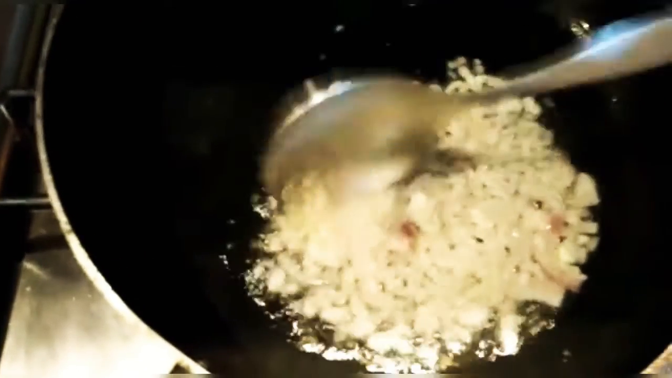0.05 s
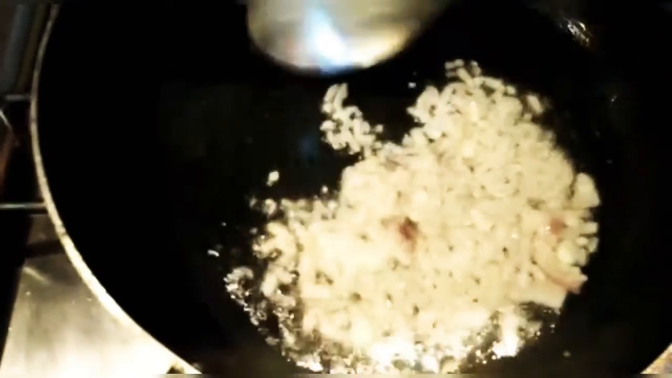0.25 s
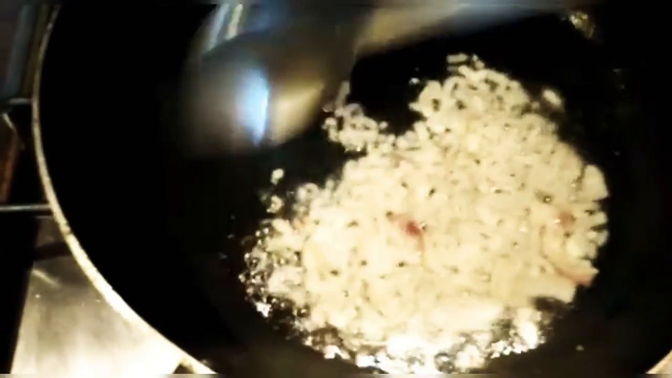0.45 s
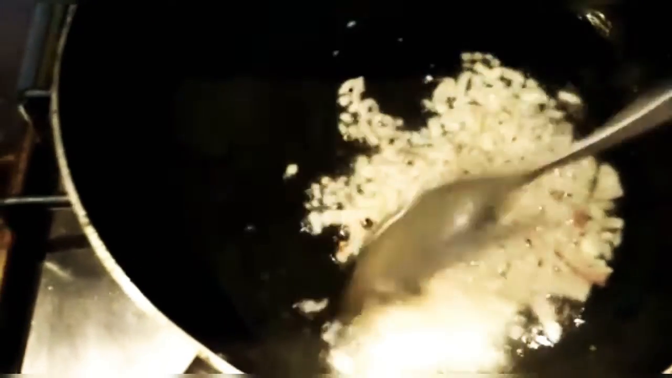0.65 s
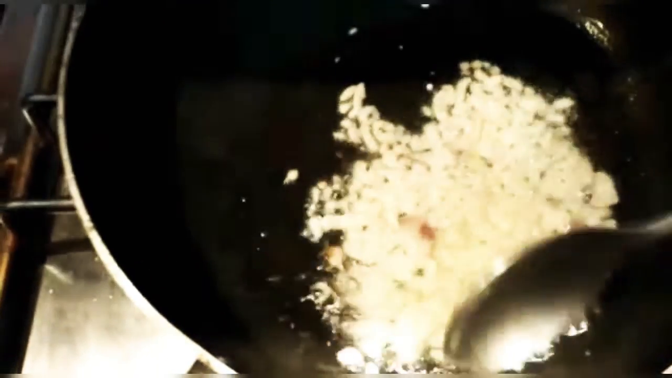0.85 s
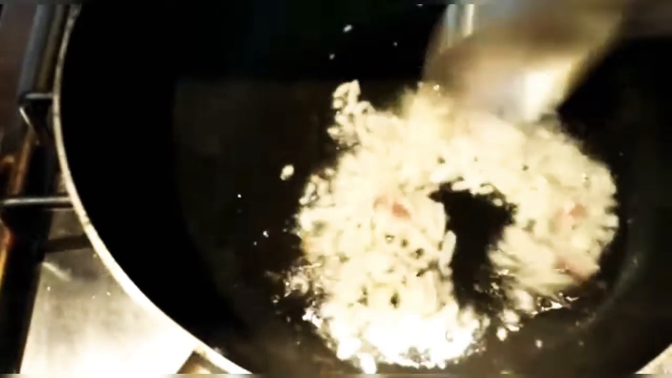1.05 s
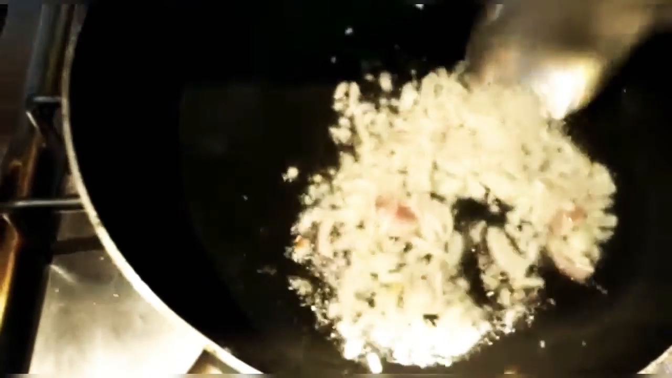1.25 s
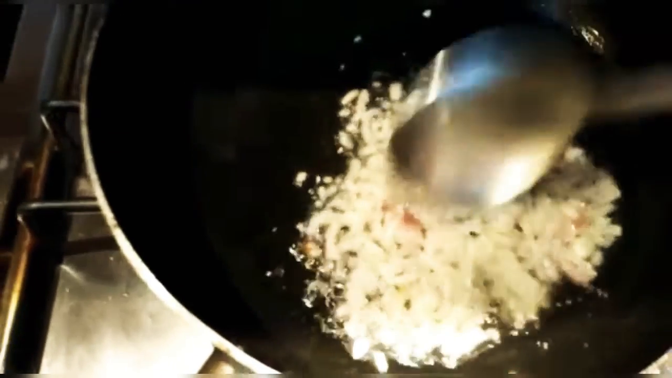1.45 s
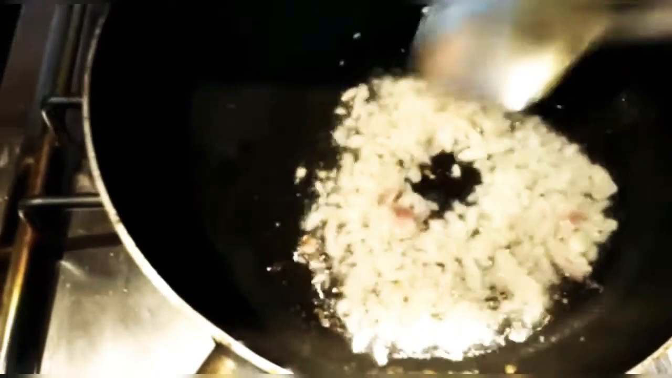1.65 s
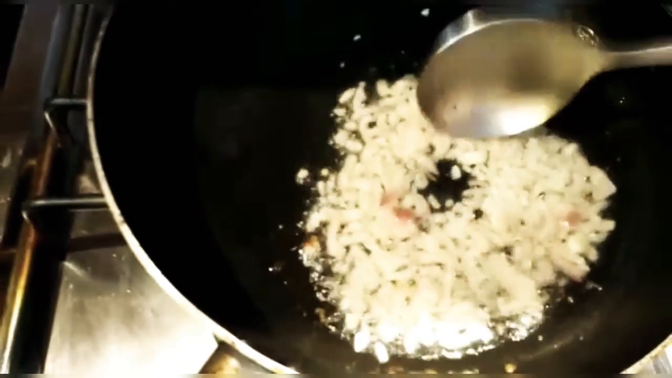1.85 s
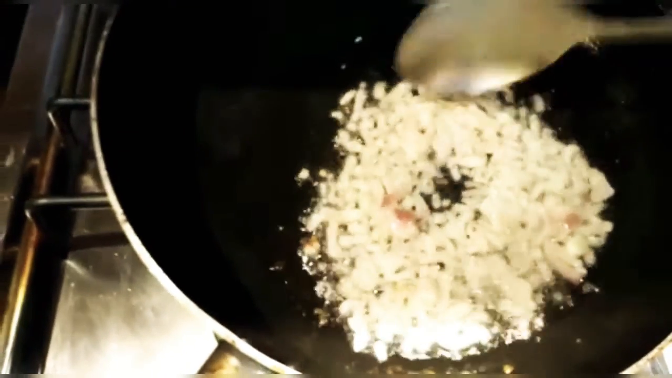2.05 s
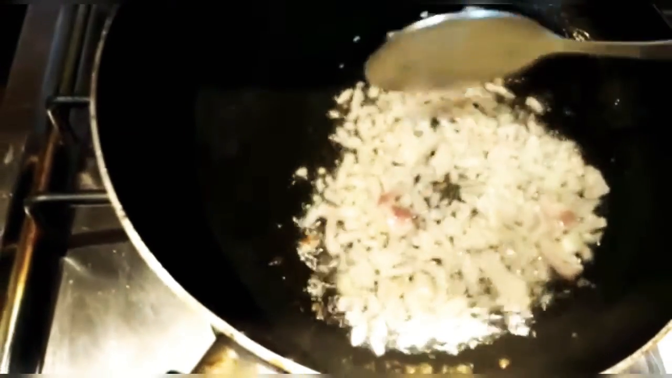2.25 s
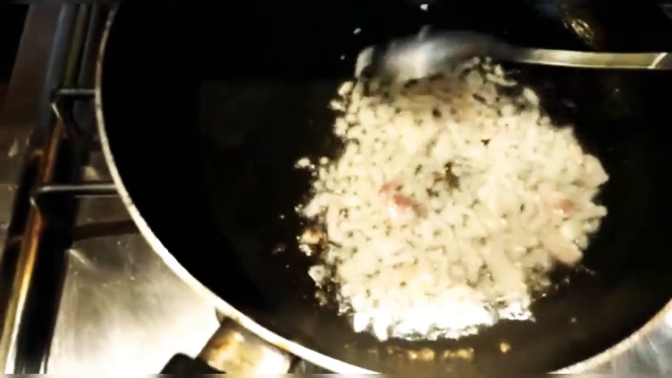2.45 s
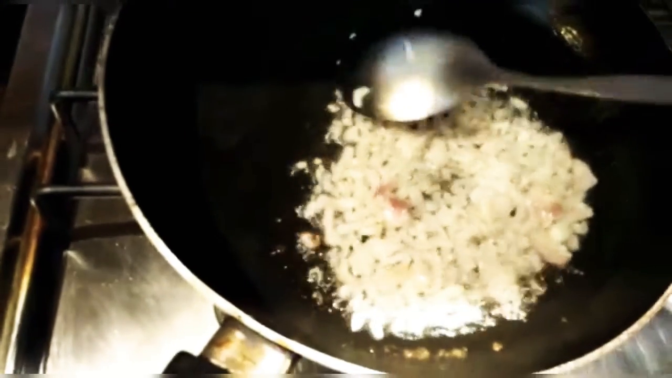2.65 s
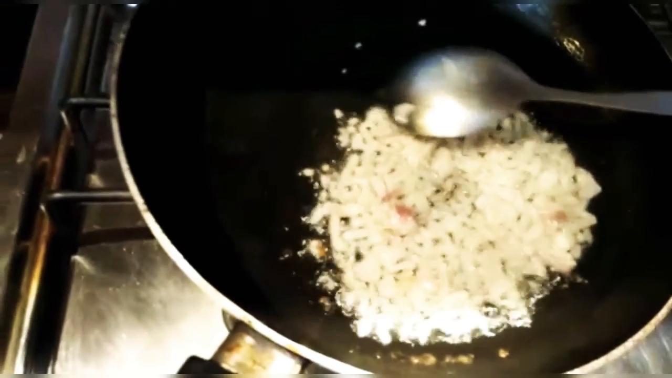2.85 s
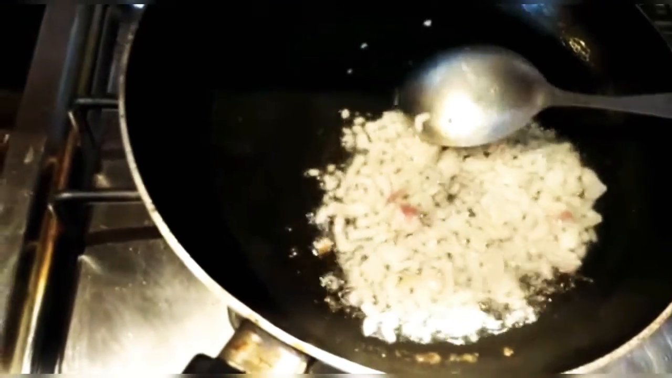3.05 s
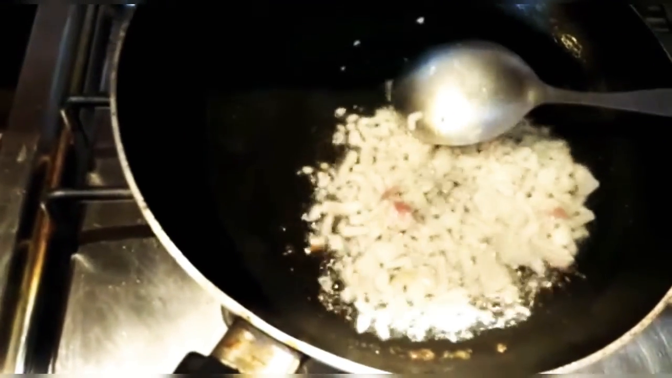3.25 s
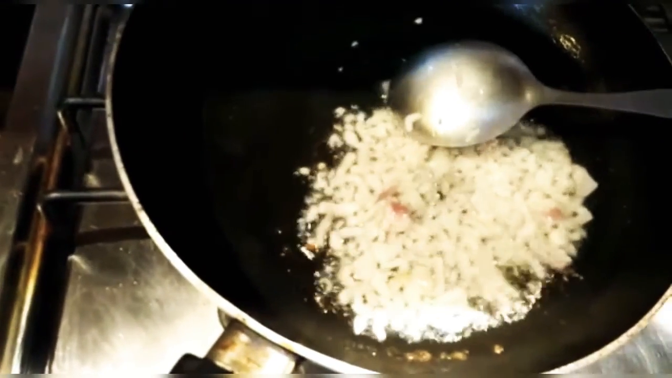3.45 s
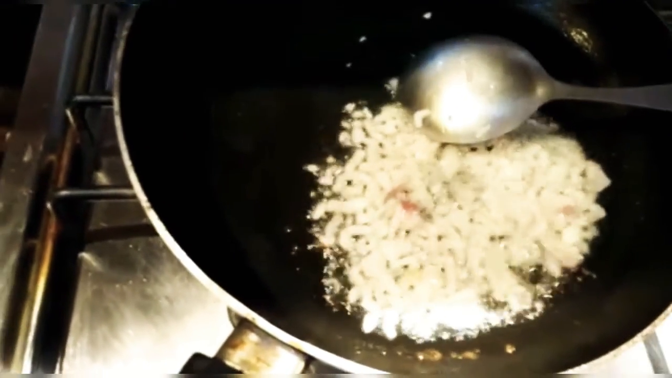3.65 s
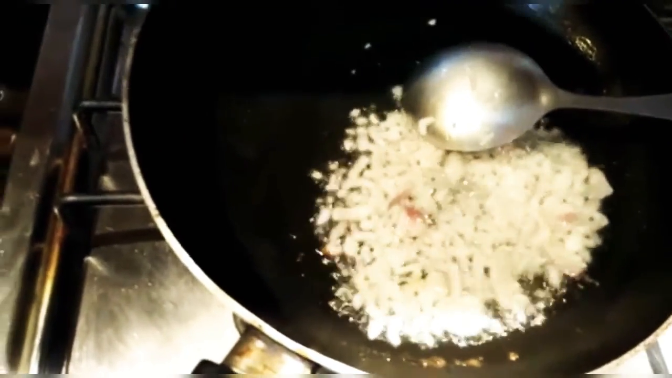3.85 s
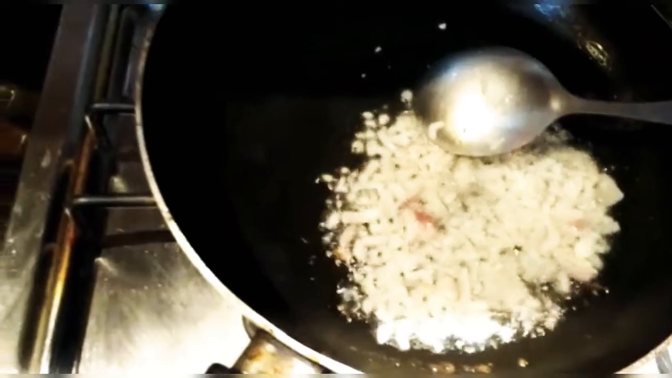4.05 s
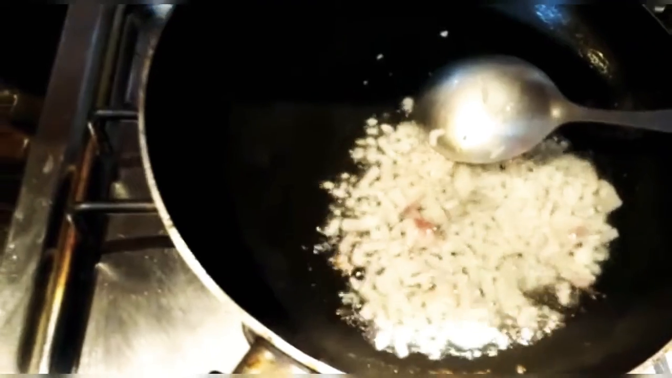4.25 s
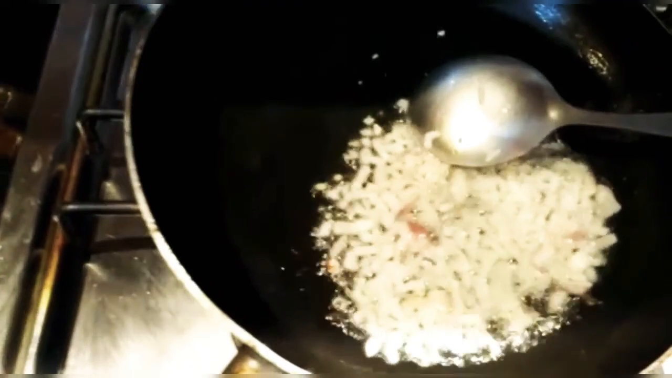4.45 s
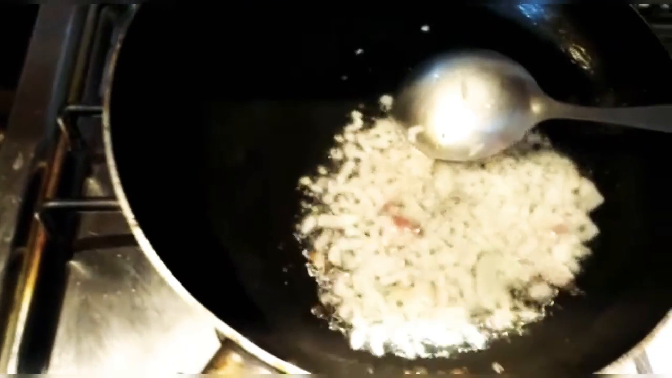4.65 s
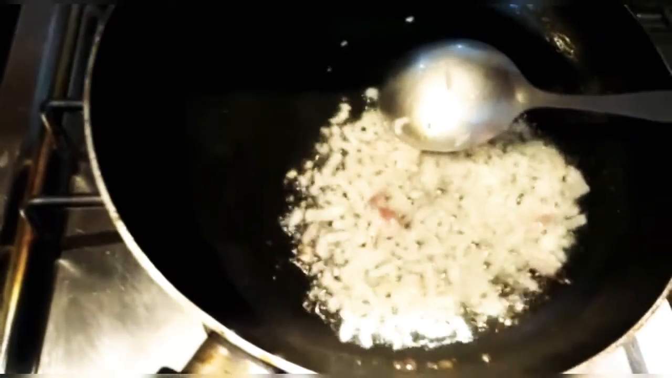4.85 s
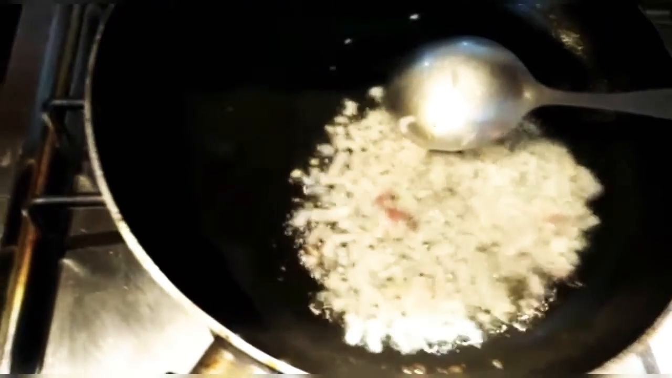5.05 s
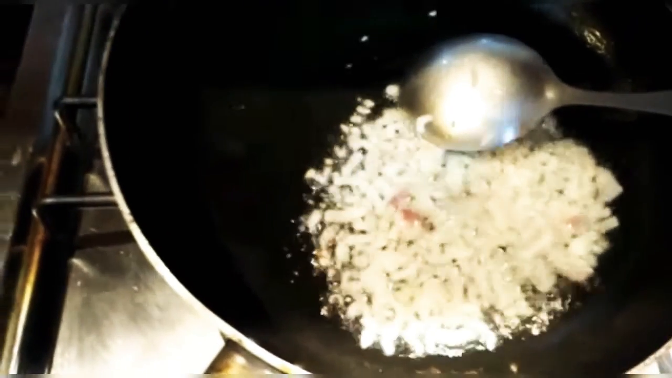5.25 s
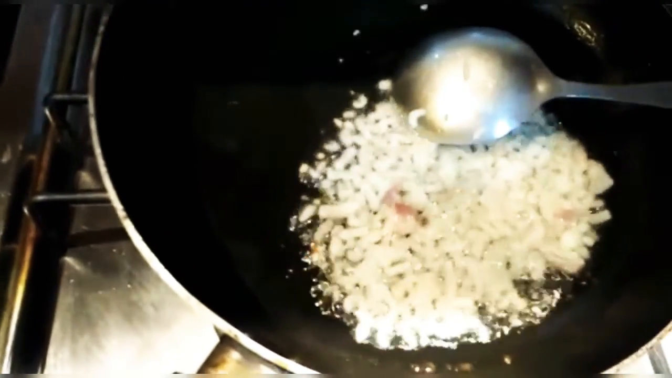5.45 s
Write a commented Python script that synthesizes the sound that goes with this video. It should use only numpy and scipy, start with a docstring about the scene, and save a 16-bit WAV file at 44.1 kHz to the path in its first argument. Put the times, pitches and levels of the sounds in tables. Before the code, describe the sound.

A close view of onions frying in a coated pan in a small, hard-walled kitchen. A fine, bright sizzle runs throughout, strongest at the very start, flaring slightly after pops and knocks. A steel spoon hits the pan in a tight double clack at about 0.16-0.22 s, again near 0.55 s with a faint scrape, then at 0.97 s followed by a soft gritty drag of about 0.2 s. More clacks come at 1.5 and 1.87 s, each with a brief scrape. A single hard knock rings at 3.12 s, and a very faint slide and touch follow around 3.4-3.6 s. After that there is only quiet frying: small crisp oil pops, fine crackle and a few dull bubble puffs, one lower at 5.27 s, thinning to the end at about 5.6 s. Knocks are midrange, metallic and quickly damped, with short room echoes above a faint low burner hum and rumble.

```python
"""Small hard kitchen: a steel spoon knocks and scrapes a coated pan while chopped onions fry gently in oil.
Blows ring damped sine modes of the pan; slip clicks of the dragged edge drive the same modes through resonators.
Droplets pop as short rings and noise bursts, bubbles puff, dense clicks in flickering bands make the sizzle.
Decaying noise echoes follow the close sounds above a low hum. Centred; only the treble of the sizzle is wide."""
import sys
import numpy as np
from scipy import signal
from scipy.io import wavfile

SR = 44100
rng = np.random.default_rng(int(sys.argv[2]) if len(sys.argv) > 2 else 0)


def file_out(sig):
    """Save sig as 16-bit WAV at sys.argv[1]."""
    # one column per channel
    cols = np.atleast_2d(sig).T
    # limit, then scale
    lim = np.clip(cols, -1, 1)
    pcm = np.round(lim * 32767).astype(np.int16)
    wavfile.write(sys.argv[1], SR, pcm)


N = 243443


def from_db(db):
    """Amplitude factor of a level in dB."""
    return 10 ** (np.asarray(db) / 20)


def rms_one(x):
    """Scale to rms 1."""
    return x / np.sqrt(np.mean(x ** 2) + 1e-20)


def drift(rate_hz):
    """Slow chance with spread 1: noise through two equal poles, at SR / 40."""
    r = np.exp(-80 * np.pi * rate_hz / SR)
    noise = rng.standard_normal(N // 40 + 2002)
    slow = rms_one(signal.lfilter([1], [1, -2 * r, r * r], noise)[2000:])
    return np.interp(np.arange(N) / 40, np.arange(len(slow)), slow)


def ring(clicks, hz, t60_s):
    """Damped resonator: a unit click sets a sine ringing from height 1."""
    r = from_db(-60 / (t60_s * SR))
    w = 2 * np.pi * hz / SR
    return signal.lfilter([0, np.sin(w)], [1, -2 * r * np.cos(w), r * r], clicks + 1e-18)


def band(x, low_hz, high_hz):
    """Band-pass, upper edge at most 0.45 SR."""
    sos = signal.butter(2, [low_hz, min(high_hz, .45 * SR)], "band", fs=SR, output="sos")
    return signal.sosfilt(sos, x)


def split_filter(order, hz, side):
    """Low-pass or high-pass sections."""
    return signal.butter(order, hz, side, fs=SR, output="sos")


def grains(per_s, spread_db):
    """Random clicks of uneven size and either sign; rms 1."""
    sizes = from_db(spread_db * np.minimum(rng.exponential(1, N), 5))
    signed = sizes * rng.choice([-1, 1], N)
    return rms_one(signed * (rng.random(N) < per_s / SR))


def coloured(sources, spectrum, patchy_db):
    """Half-octave bands, each with own level and flicker, fed by two unrelated sources in turn; rms 1."""
    out = 0
    together = drift(0.8)
    edges_hz = 110 * 2 ** np.arange(0, 7.6, .5)
    hz, level_db = np.transpose(spectrum)
    for k, (low_hz, high_hz) in enumerate(zip(edges_hz, edges_hz[1:])):
        band_db = np.interp(np.log(low_hz * high_hz) / 2, np.log(hz), level_db, -90, -90)
        flicker_db = patchy_db * (1.07 * together + drift(30))
        out = out + from_db(band_db + flicker_db) * band(sources[k % 2], low_hz, high_hz)
    return rms_one(out)


def add(out, s, sound):
    """Mix a sound in at s seconds."""
    at = round(s * SR)
    out[at:at + len(sound)] += sound[:N - at]


def burst(length_s, t60_s):
    """Noise that starts at once and dies away."""
    t = np.arange(round(length_s * SR)) / SR
    return rng.standard_normal(len(t)) * from_db(-60 * t / t60_s)


def after(times_s, level_db, rise_s, t60_s):
    """Envelope that swells after each moment and dies away: two one-pole smoothers in a row."""
    marks = np.zeros(N)
    marks[np.round(np.asarray(times_s) * SR).astype(int)] = from_db(level_db)
    rise = np.exp(-1 / (rise_s * SR))
    fall = from_db(-60 / (t60_s * SR))
    return signal.lfilter([1 - rise], np.convolve([1, -rise], [1, -fall]), marks + 1e-18)


# hum spectrum: f/Hz, relative level/dB per Hz
HUM = [(94, -43.5), (160, -9), (243, -10), (471, -9), (638, -6.5), (888, 6.5), (1170, -4.5), (1330, -7),
       (1580, -1), (2540, -7.5), (5000, -10.5), (6500, -27.5), (11000, -120)]
HUM_DB = -63
RUMBLE_DB, RUMBLE_WAVER_DB = -71.5, 4
SHAKE_DB, SHAKE_RISE_S, SHAKE_T60_S = -44.5, .006, 0.3   # stove top shakes most after knocks heavy in the bass


def hum():
    """Noise of burner and room above a wavering stove rumble that knocks stir up."""
    s, knock_db, *_, weight_db = np.transpose(KNOCKS)
    wavering = from_db(RUMBLE_DB + RUMBLE_WAVER_DB * drift(5))
    shake = after(s, knock_db + weight_db + SHAKE_DB, SHAKE_RISE_S, SHAKE_T60_S)
    rumble = (wavering + shake) * rms_one(band(rng.standard_normal(N), 40, 130))
    return rumble + from_db(HUM_DB) * coloured(rng.standard_normal((2, N)), HUM, patchy_db=1.4)


# sizzle spectrum: f/Hz, relative level/dB per Hz
SIZZLE = [(880, -46), (1500, -13.5), (2630, -7), (3260, -16), (4480, -6.5), (7010, -11), (9280, 7.5),
          (12600, -8.5), (13400, -13), (14000, -58)]


def sizzle():
    """Thousands of tiny steam bubbles a second, as clicks coming in gusts."""
    fizz = [grains(per_s=9000, spread_db=0.5) for _ in range(2)]
    return coloured(fizz, SIZZLE, patchy_db=2.0)


CRACKLE_PER_S, CRACKLE_DB = 51, -16   # level against the sizzle


def crackle():
    """Sparse tiny snaps riding on the sizzle."""
    return from_db(CRACKLE_DB) * rms_one(band(grains(CRACKLE_PER_S, spread_db=4.5), 5000, 17000))


# vigour of the frying before flares and gusts: t/s, level/dB
FRYING = [(0.0, -44), (0.21, -49), (0.69, -55), (1.03, -52), (1.38, -53), (2.09, -48), (2.2, -50),
          (2.49, -53), (2.67, -55), (2.91, -52), (3.03, -51), (3.14, -50.5), (3.95, -58.5), (4.4, -53.5),
          (4.81, -54), (5.2, -52.5), (5.4, -57), (5.52, -59)]
FLARE_DB, FLARE_RISE_S, FLARE_T60_S = -33.5, 0.011, 0.49
STIR_FLARE_DB = -44.5   # a knock presses wet onion into the oil
USUAL_SPATTER_S = .05


def frying():
    """Level of the sizzle: pops and knocks throw droplets that flare up and boil off."""
    pop_s, pop_db, _, spatter_s = np.transpose(POPS)
    hit_s, hit_db = np.transpose(KNOCKS)[:2]
    # a long spatter throws more
    thrown_db = pop_db + 20 * np.log10(np.maximum(spatter_s, .005) / USUAL_SPATTER_S)
    flare_db = np.append(thrown_db + FLARE_DB, hit_db + STIR_FLARE_DB)
    flare = after(np.append(pop_s, hit_s), flare_db, FLARE_RISE_S, FLARE_T60_S)
    gusts = from_db(1.0 * drift(9))
    vigour_db = np.interp(np.arange(N) / SR, *np.transpose(FRYING))
    return (from_db(vigour_db) + flare) * gusts


# droplets bursting in the oil: t/s, relative level/dB, f/Hz, spatter t60/s
POPS = [(0.0672, -20.5, 8600, 0.055), (0.294, -27.5, 7750, 0.081), (0.4193, -28, 8400, 0.028),
        (0.4565, -25, 9300, 0.028), (0.636, -23, 8900, 0.091), (0.826, -21, 9500, 0.039),
        (0.845, -20.5, 9500, 0.065), (0.9073, -24, 8950, 0.04), (1.0158, -25, 9600, 0.035),
        (1.311, -13.5, 6500, 0.018), (1.9385, -18.5, 9000, 0.069), (1.945, -23, 9000, 0.034),
        (1.9735, -23, 8040, 0.027), (2.096, -23.5, 8600, 0.031), (2.1126, -21, 9600, 0.05),
        (2.368, -14, 8950, 0.022), (2.3843, -30.5, 9500, 0.055), (2.4842, -27.5, 8840, 0.039),
        (2.4953, -14.5, 8700, 0.034), (2.873, -25, 9100, 0.033), (2.986, -25, 8500, 0.053),
        (3.0647, -26.5, 9330, 0.034), (3.252, -12.5, 10600, 0.027), (3.5649, -18.5, 6200, 0.016),
        (3.6132, -28.5, 7990, 0.1), (3.6423, -20, 9700, 0.025), (3.668, -25.5, 8300, 0.051),
        (3.7412, -30.5, 7670, 0.073), (3.7533, -27, 8300, 0.023), (4.085, -22, 10800, 0.076),
        (4.2385, -25, 9840, 0.061), (4.2686, -20.5, 7100, 0.022), (4.5042, -22, 10060, 0.026),
        (4.851, -37.5, 4450, 0.073), (5.0143, -31, 8100, 0.079), (5.1424, -25, 7600, 0.075),
        (5.1535, -35, 9910, 0.05), (5.2181, -22, 9800, 0.067)]
POP_DELAY_S = 0.0014
SNAP_DB, HISS_DB, THUD_DB, SPATTER_DB = 4, -5, -15, -9   # against the pop level


def pops():
    """A burst rings a few cycles, thuds on the pan and throws a short spatter."""
    out = np.zeros(N)
    click = np.eye(1, round(.15 * SR))[0]
    for s, level_db, hz, spatter_s in POPS:
        snap = from_db(SNAP_DB) * ring(click, hz, 10.0 / hz)
        hiss = from_db(HISS_DB) * band(burst(.15, t60_s=0.0022), 4950, 20000)
        thud = from_db(THUD_DB) * band(burst(.15, t60_s=0.018), 250, 3300)
        spatter = from_db(SPATTER_DB) * band(burst(.15, max(spatter_s, .005)), 6700, 12000)
        pop = band(snap + hiss, 0.6 * hz, 14000) + thud + spatter
        add(out, s + POP_DELAY_S, from_db(level_db) * pop)
    return out


# pan modes, also driven by the scrape: f/Hz, relative level/dB, t60/s before the cap by MOST_CYCLES
PAN = [(165, -26, 0.042), (276.2, -20, 0.18), (286, -38, 0.19), (477, -17, 0.079), (613, -17.5, 0.13),
       (709.7, -10, 0.14), (757, -2, 0.26), (798.3, -3, 0.42), (817, -8.5, 0.08), (915.5, -4, 0.057),
       (1023, 3, 0.038), (1100, -6.5, 0.27), (1211, -12.5, 0.11), (1273, -4, 0.04), (1448, -3.5, 0.03),
       (1626, -4.5, 0.032), (1757, -16, 0.025), (1820, -12, 0.049), (2030, -6.5, 0.087), (2080, -10, 0.039),
       (2271, -2.5, 0.18), (2444, -8.5, 0.041), (2740, -4.5, 0.15), (2770, -5, 0.12), (3085, -13.5, 0.032),
       (3330, -21.5, 0.09), (3820, -21, 0.09), (4550, -27.5, .02), (5060, -32.5, .02)]
# spoon blows: t/s, relative level/dB, hardness/dB per octave above 800 Hz, favoured f/Hz,
# relative crack level/dB, weight below 560 Hz/dB
KNOCKS = [(0.159, -3.5, -4, 1084, -24.5, -30), (0.168, -19, 5.5, 1240, -33, -17),
          (0.203, -12, -5, 784, -56, -12), (0.22, -14.5, 3, 815, -43.5, -26),
          (0.553, -6.5, -4, 1160, -41, -18), (0.564, -8, -2.5, 2450, -38, -6),
          (0.596, -25.5, -10, 1260, -65, -1), (0.965, -3, 0, 833, -31, -6.5),
          (0.982, -26, -0.5, 940, -54, -2), (1.491, -8, 3, 1330, -26, -6.5),
          (1.502, -16.5, -0.5, 1500, -59, 8), (1.524, -15, -11, 920, -62, -16),
          (1.854, -4.5, -6.5, 2200, -44, -23), (1.86, -15, -4.5, 1160, -43.5, -10.5),
          (1.91, -26, 4.5, 2050, -48, -3), (3.121, -3, 0, 1420, -21.5, -4),
          (3.551, -27.5, 0, 1460, -66.5, -6)]
MOST_CYCLES = 70   # longest t60 of a mode
BASS_BELOW_HZ, HARD_ABOVE_HZ = 560, 800
KNOCK_LIFT_DB = 7   # modes near the favoured pitch
LOAD_SPREAD_DB, LOAD_DETUNE = 2.0, .025   # detune as a share of f
MODES_DB, CRACK_DB, TICK_DB = -16.5, 5.5, 7   # added to the table levels
TICK_S = .00025   # first touch of steel
LEAD_S, LEAD_DB, LEAD_HZ, LEAD_T60_S, LEAD_GAP_S = .007, -23.5, 706, 0.05, .1


def lift(hz, centre_hz, lift_db):
    """Where the spoon touches, modes near one pitch are favoured; gain in dB."""
    return lift_db * np.exp(-(np.log2(hz / centre_hz) / 0.32) ** 2)


def knocks():
    """Every blow rings all modes; food and spoon load the pan differently each time and shift them a little."""
    out, t = np.zeros(N), np.arange(round(.3 * SR)) / SR
    hz, mode_db, t60_s = np.transpose(PAN)[:, :, None]
    high, low = [split_filter(4, BASS_BELOW_HZ, side) for side in ("high", "low")]
    octaves = np.maximum(np.log2(hz / HARD_ABOVE_HZ), 0)
    decay_db = -60 * t / np.minimum(t60_s, MOST_CYCLES / hz)
    last_s = 0
    for s, knock_db, hardness, centre_hz, crack_db, weight_db in KNOCKS:
        load, sign, detune = rng.standard_normal((3, len(PAN), 1))
        level_db = mode_db + hardness * octaves + lift(hz, centre_hz, KNOCK_LIFT_DB) + LOAD_SPREAD_DB * load
        sines = np.sin(2 * np.pi * hz * (1 + LOAD_DETUNE * detune) * t)
        modes = (np.sign(sign - .6) * from_db(level_db + decay_db) * sines).sum(axis=0)
        upper = signal.sosfilt(high, modes)
        lower = from_db(weight_db) * signal.sosfilt(low, modes)
        add(out, s, from_db(knock_db + MODES_DB) * (upper + lower))
        crack = band(burst(.05, t60_s=0.048), 2000, 11000)   # steel on coating
        add(out, s, from_db(crack_db + CRACK_DB) * crack)
        add(out, s, from_db(crack_db + TICK_DB) * np.hanning(TICK_S * SR))
        if s - last_s > LEAD_GAP_S:   # after a gap, a soft low touch leads the blow
            touch = np.sin(2 * np.pi * LEAD_HZ * t)
            add(out, s - LEAD_S, from_db(knock_db + LEAD_DB - 60 * t / LEAD_T60_S) * touch)
        last_s = s
    return out


# edge drags: t/s, length/s, relative level/dB, swell to the end/dB, singing f/Hz at mid-stroke,
# hardness/dB per octave above 800 Hz at mid-stroke, drone level of the pan bottom/dB
STROKES = [(0.189, 0.025, -28.5, 3, 800, -1.5, -28.5), (0.587, 0.084, -38, 5.5, 1440, 7, -37.5),
           (1.004, 0.22, -40.5, 6, 1880, 3.5, -41), (1.518, 0.031, -20, -5.5, 1280, -14, -32),
           (1.875, 0.048, -34, -2, 1900, -12, -37), (3.134, 0.076, -34, -10.5, 1510, 4, -38.5),
           (3.385, 0.0805, -64, 23.5, 1460, -6.5, -53.5), (3.556, 0.056, -46.5, -7.5, 1500, 7, -50.5)]
DRONE_HZ, DRONE_T60_S = 768, .035
DRONE_FOLLOWS = 0.33   # share of the swell that reaches the drone
DRAG_ATTACK_DB_PER_S, DRAG_RELEASE_DB_PER_S = 907.5, 902
SING_DB, SING_RISE_OCTAVES = 9, 0.18   # lift at the singing pitch; its climb along a stroke
HARDEN_DB = 5.5   # the edge bites harder along a stroke, dB per octave
DRAG_DB, DRAG_BASS_DB = -29.0, -5   # dragging hardly moves the low modes


def scrape():
    """Dense uneven slips of the edge drive the same modes, over a drone of the bottom."""
    out, t = np.zeros(N), np.arange(-.05, .45, 1 / SR)
    slips = from_db(1.5 * drift(36)) * grains(per_s=2600, spread_db=-1.5)
    drone = rms_one(ring(grains(per_s=2900, spread_db=1.0), DRONE_HZ, DRONE_T60_S))
    slips, drone = np.append(slips, t * 0), np.append(drone, t * 0)
    for s, length_s, level_db, swell_db, centre_hz, hardness, drone_db in STROKES:
        at = round((s + t[0]) * SR)
        along = np.clip(t / length_s, 0, 1)
        attack_db = DRAG_ATTACK_DB_PER_S * np.minimum(t, 0)
        edges_db = attack_db - DRAG_RELEASE_DB_PER_S * np.maximum(t - length_s, 0)
        drag = from_db(level_db + swell_db * along + edges_db) * slips[at:at + len(t)]
        drone_level_db = drone_db + DRONE_FOLLOWS * swell_db * along + edges_db
        sound = from_db(drone_level_db) * drone[at:at + len(t)]
        sings_hz = centre_hz * 2 ** (SING_RISE_OCTAVES * (along - .5))
        bite_db_per_octave = hardness + HARDEN_DB * (along - .5)
        for k, (hz, mode_db, t60_s) in enumerate(PAN):
            bite_db = bite_db_per_octave * max(np.log2(hz / HARD_ABOVE_HZ), 0)
            bass_db = DRAG_BASS_DB * (hz < BASS_BELOW_HZ)
            drive = drag * from_db(mode_db + DRAG_DB + lift(hz, sings_hz, SING_DB) + bite_db + bass_db)
            damped_s = .5 * min(t60_s, MOST_CYCLES / hz)   # the pressing spoon damps the pan
            sound += (-1) ** k * ring(drive, hz, damped_s)
        add(out, s + t[0], sound)
    return out


# larger bubbles breaking softly among the onions: t/s, relative level/dB, f/Hz
BUBBLES = [(.361, -38, 1890), (0.407, -39, 2070), (2.757, -40.5, 2300), (2.855, -38.5, 780),
           (4.754, -41, 2510), (4.81, -50, 850), (4.991, -36, 1660), (5.069, -43.5, 2990),
           (5.273, -30.5, 526)]


def bubbles():
    """A dull puff of decaying noise around the pitch of the bubble."""
    out = np.zeros(N)
    for s, level_db, hz in BUBBLES:
        puff = band(burst(.1, t60_s=0.084), hz / 1.4, hz * 1.4)
        add(out, s, from_db(level_db - 2.5) * puff)
    return out


# echo bands: from f/Hz, to f/Hz (at most 0.45 SR in use), t60/s
KITCHEN = [(147, 485, 0.18), (490, 1320, 0.36), (1130, 4100, 0.29), (3240, 21100, 0.13)]
KITCHEN_DB, FIRST_WALL_S = -11, .006


def kitchen(x):
    """Dense echoes: noise that dies away band by band after the first wall."""
    tail = sum(band(burst(.8, t60_s), low_hz, high_hz) for low_hz, high_hz, t60_s in KITCHEN)
    echoes = np.append(np.zeros(round(FIRST_WALL_S * SR)), tail / np.linalg.norm(tail))
    return signal.fftconvolve(x, echoes)[:N]


WIDE_ABOVE_HZ, WIDE_DB = 3570, -4


def scene():
    """Blows and pops sit in the middle; the treble of the sizzle spreads to both sides."""
    spoon = signal.sosfilt(split_filter(2, 170, "high"), knocks() + scrape())
    close = spoon + pops() + bubbles()
    heat = frying()
    echoes = from_db(KITCHEN_DB) * kitchen(close)
    mid = close + echoes + heat * (sizzle() + crackle()) + hum()
    treble = signal.cheby2(10, 60, WIDE_ABOVE_HZ, "high", fs=SR, output="sos")
    side = from_db(WIDE_DB) * signal.sosfilt(treble, heat * sizzle())
    return np.array([mid + side, mid - side])


CUTOFF_HZ = 13180


def record(dry):
    """The top is cut steeply by an elliptic low-pass."""
    return signal.sosfilt(signal.ellip(10, .5, 60, CUTOFF_HZ, fs=SR, output="sos"), dry)


dry = scene()
out = record(dry)
file_out(out)
```